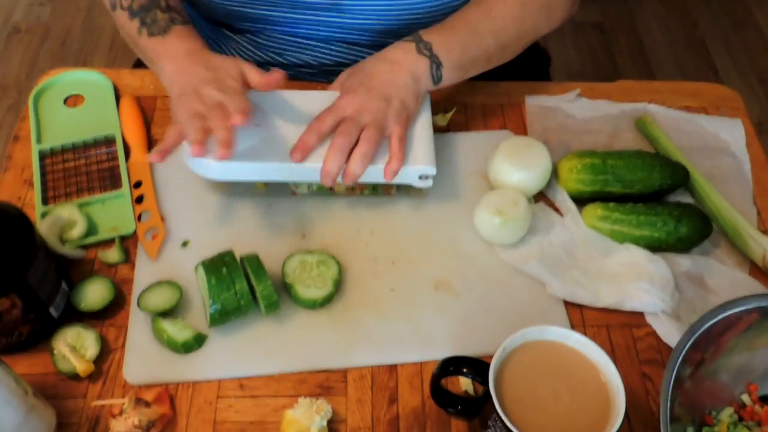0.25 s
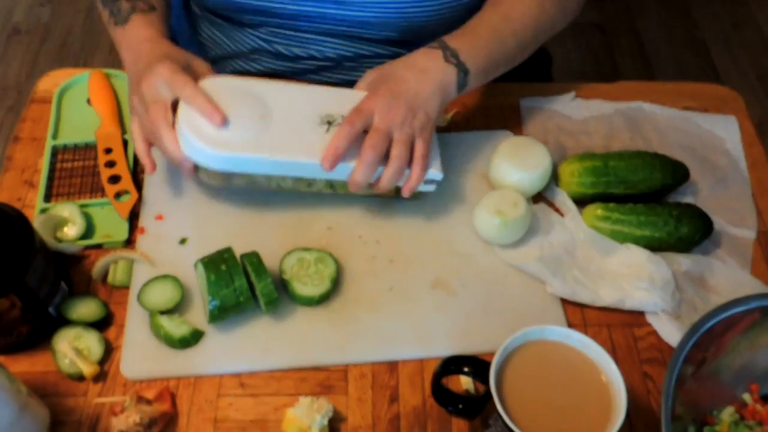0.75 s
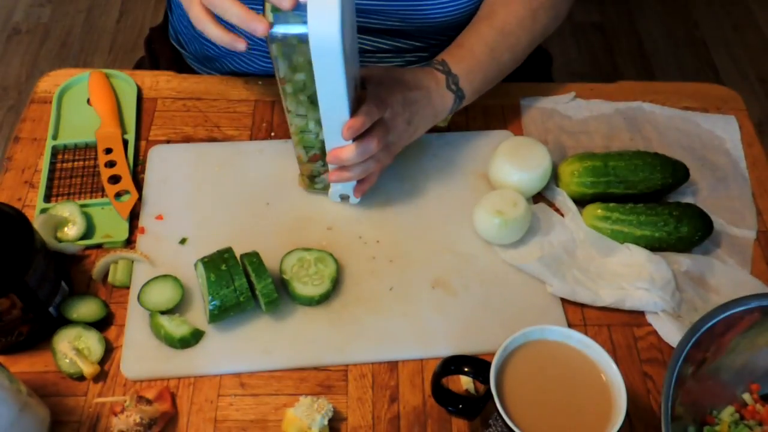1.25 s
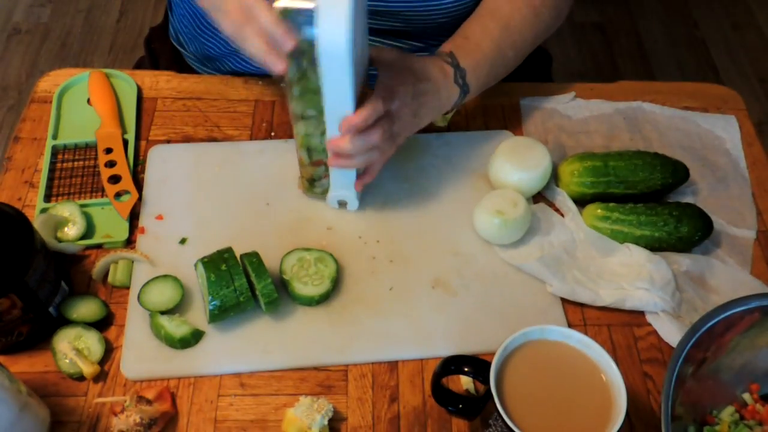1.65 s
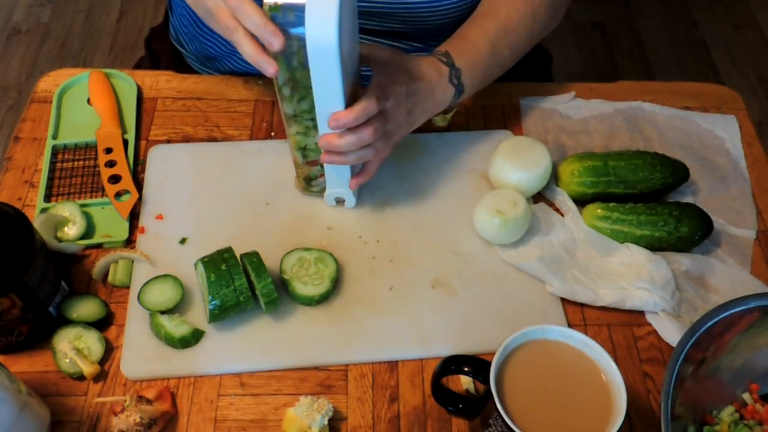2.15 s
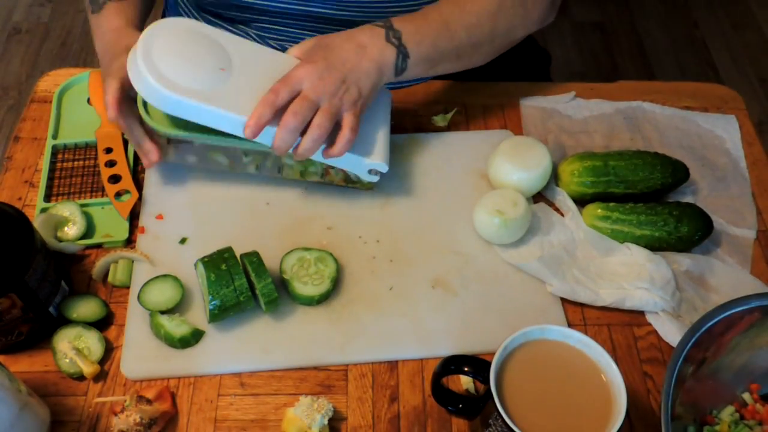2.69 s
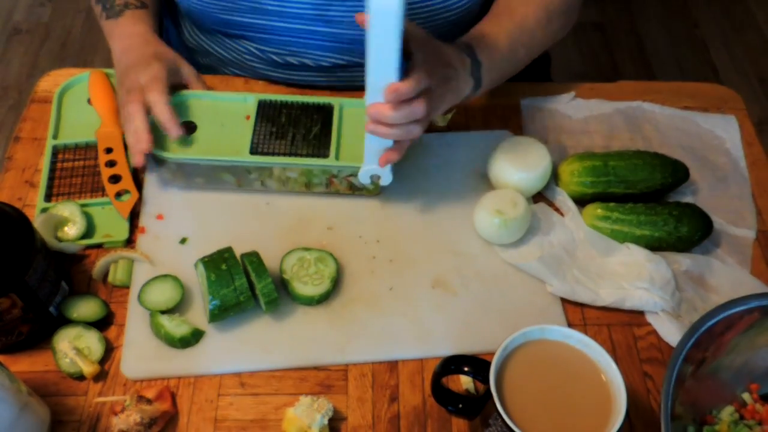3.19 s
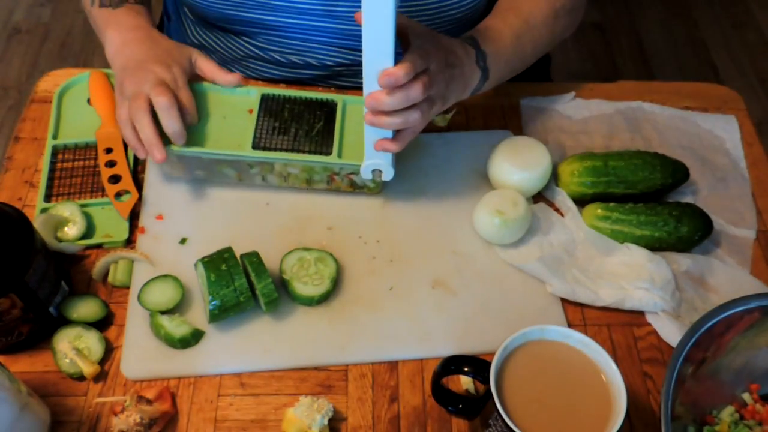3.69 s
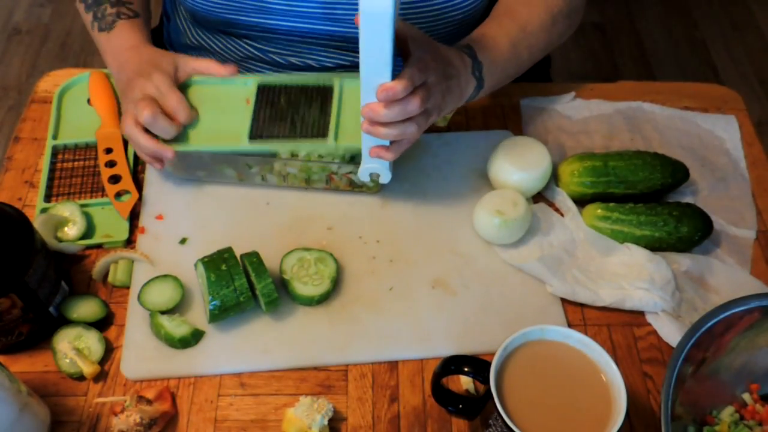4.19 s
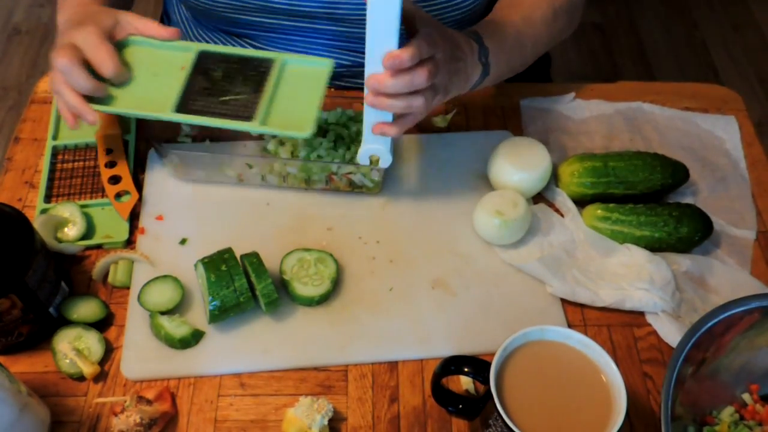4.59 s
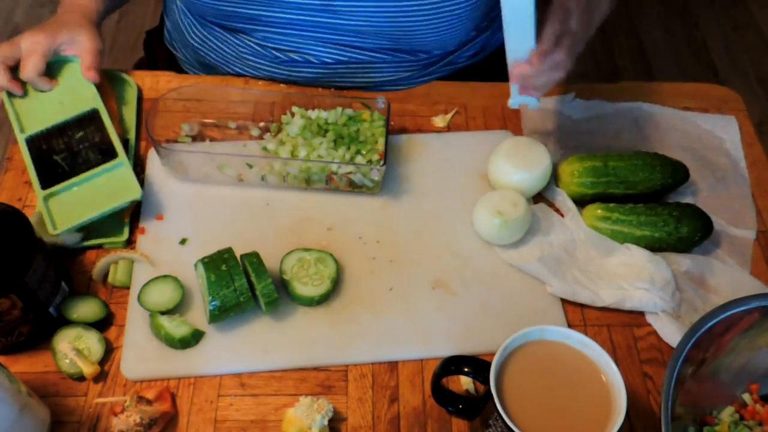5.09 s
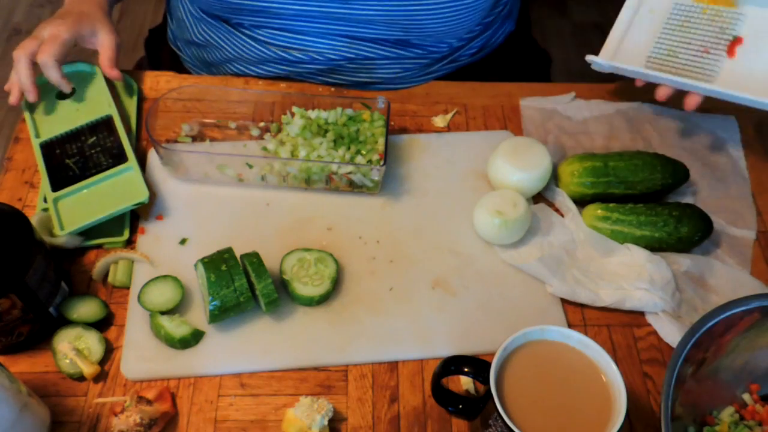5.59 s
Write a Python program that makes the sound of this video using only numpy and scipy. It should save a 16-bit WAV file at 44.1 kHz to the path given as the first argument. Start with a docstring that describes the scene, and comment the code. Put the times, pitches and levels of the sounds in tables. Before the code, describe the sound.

Two hard plastic slams with rattling rebounds, then hollow knocks on a box, a sharp plate snap, and a light clatter over fan hum.

```python
"""A plastic vegetable chopper on a cutting board: its lid is slammed down twice, the box is knocked and opened,
and its blade plate is prised out and laid aside. Impacts excite damped modes of board, table, box and plate
and shaped noise for walls and edges; rubbing is grainy noise. A fan adds air noise and unsteady tones, a low
rumble swells slowly, and handling bumps the microphones. Blows and rubs echo in a small kitchen. The close
microphones overload on strong peaks; their gain sinks and climbs steadily back."""
import sys
import numpy as np
from scipy import signal
from scipy.fft import rfft, irfft, next_fast_len
from scipy.io import wavfile
from scipy.ndimage import map_coordinates

SR = 44100
rng = np.random.default_rng(int(sys.argv[2]) if len(sys.argv) > 2 else 0)


def int16_out(signal):
    """Quantize to a 16-bit WAV file."""
    q = np.round(np.clip(np.atleast_2d(signal).T, -1, 1) * 32767)
    wavfile.write(sys.argv[1], SR, q.astype(np.int16))


N = 257984
AGE = np.arange(SR // 2) / SR  # time since a blow (s)

# spectrum of the fan's air noise, relative: (frequency [Hz], level [dB])
AIR_SPECTRUM = [(20, -12.5), (100, -6), (190, -12.5), (270, -2.5), (350, -6.5), (430, -11), (760, -10),
                (1300, -19.5), (2500, -25), (5000, -31), (8500, -32.5), (12500, -32.5), (14300, -42.5)]
# stereo width of the air noise: (frequency [Hz], side relative to mid [dB])
AIR_WIDTH = [(60, -6.5), (110, -13), (200, -17.5), (370, -19), (670, -10), (1230, -3.5), (2240, -2),
             (4100, 2), (7490, 0), (13700, -0.5)]
# fan tones: (frequency [Hz], mean level [dB])
FAN_TONES = [(242.2, -46.5), (360.7, -41), (748.3, -49), (1082, -60), (1497, -54), (1556, -59)]
# spectrum of the low rumble, relative: (frequency [Hz], level [dB])
RUMBLE_SPECTRUM = [(8, -2.5), (25, 1.5), (60, -3), (110, -7.5), (170, -14), (400, -59.5), (1000, -100)]
# stereo width of the rumble: (frequency [Hz], side relative to mid [dB])
RUMBLE_WIDTH = [(30, -1.0), (120, -5)]
# slow swells of the low rumble: (time [s], length [s], peak level before lumps [dB])
RUMBLE_SWELLS = [(0.45, 1, -32), (1.65, 0.72, -45), (2.705, 0.6, -39), (4.988, 0.65, -38.5)]
RUMBLE_REST_DB = -45.5  # between swells
# low bumps from handling the microphones: (time [s], frequency [Hz], level [dB], left relative to right [dB])
HANDLING_BUMPS = [(0.083, 88, -23, -27), (2.509, 113, -15.5, 14), (3.277, 83.6, -12.5, -10),
                  (4.076, 62, -14, -2), (5.315, 61, -16, 11)]
BUMP_T60_S = 0.052  # short and damped

# modes of the board on its table: (frequency [Hz], relative level [dB], decay t60 [s])
BOARD_MODES = [(223.8, -11.5, 0.16), (258, 1, 0.095), (280.6, -2.5, .08), (312.3, -2, 0.11)]
# modes of the hollow box: (frequency [Hz], relative level [dB], decay t60 [s])
BOX_MODES = [(293.2, -17, 0.19), (374.8, -3.5, 0.15), (478.4, -10, 0.12), (582, -12, 0.055),
             (667, -26, .08), (837, -17, 0.013), (949, -30, 0.15)]
# resonances of the thin plastic walls: (frequency [Hz], bandwidth [Hz], relative level [dB])
WALL_RESONANCES = [(473, 75, 8.5), (727, 172, 3.5), (910, 156, 2.5), (1143, 160, 1.5), (1525, 580, 1),
                   (2040, 610, -2.5), (2980, 450, -8), (5070, 2200, -13), (6260, 1100, -10)]
# spectrum of hard edges meeting: (frequency [Hz], relative level [dB])
EDGE_SPECTRUM = [(300, -27), (1200, -6.5), (2200, 1.5), (4000, 0.5), (6000, 0), (9500, 0.5), (12500, -5),
                 (14500, -1.5)]
# diffuse echo of the kitchen: (frequency [Hz], decay t60 [s], echo level before build-up [dB])
KITCHEN_ECHO = [(149.7, 0.51, 0.5), (267, 0.33, -20.5), (397, 0.23, -1), (1250, 0.34, -2),
                (3480, 0.33, -4.5), (10000, 0.27, -4.5)]
# stereo width of contact noise, rubbing and echo: (frequency [Hz], side relative to mid [dB])
CONTACT_WIDTH = [(150, -19.5), (370, -21.5), (900, -14), (2200, -6), (5500, 0.5), (13000, -0.5)]

# slams: (time [s], travel to the stop [s], strength [dB], weight on the board [dB], hardness of first touch [dB])
SLAMS = [(0.1472, 0.018, 11.5, -2, -15), (0.5238, 0.013, 14.5, -14.5, 3.5)]
# table modes under a slam: (frequency [Hz], relative level [dB], decay t60 [s])
TABLE_MODES = [(85.6, -3.5, 0.42), (149, 1.5, 0.34)]
TABLE_DB, TABLE_GROWS = -3, 0.29  # offset at a board thud of 0 dB, and dB per dB of thud
SLAM_HZ = 885  # centre of the clack
SLAM_BOX_DB, SLAM_CLACK_DB, SLAM_SNAP_DB = -0.5, -2, -4  # base offsets from the slam strength
STOP_BOARD_DB = -5  # the stop pushes the board less than the first touch
STOP_SNAP_SHARE = 0.5  # after a soft first touch the stop cracks harder (dB per dB)
REBOUND_S, REBOUND_LOSS_DB = 0.0125, 3.5  # time between rebounds, loss at each

# knocks on board or hand, body and snap relative to strength:
# (time [s], strength [dB], hollow body [dB], edge snap [dB])
KNOCKS = [(0.824, -25.5, -2, -27), (1.127, -11, -2, -25), (1.731, -28.5, 0.5, -21), (1.787, -17, -2, -31),
          (1.864, -3, -4, -7), (1.950, -20.5, -2, -25), (2.026, -37.5, 3, -30), (3.668, -22, -16, -19),
          (3.857, -18, -11, -28), (4.1363, -26, -7, -32)]
KNOCK_HZ, KNOCK_BOARD_DB = 880, -1  # centre of the clack; board relative to box
SETTLE_S, SETTLE_LOSS_DB, SETTLE_DULL_DB = 0.009, 8, 12  # time between rocks, loss, extra loss of the snap
# rubbing of plastic, hands and wet pieces, levels at mid-stroke:
# (time [s], length [s], low rub [dB], centre of the rub [Hz], high rustle [dB])
RUBS = [(1.58, 0.47, -41.5, 840, -49.5), (2.31, 0.075, -62, 1500, -46), (2.408, 0.098, -37.5, 820, -50),
        (4.28, 0.094, -26.5, 980, -39), (5.097, 0.15, -46, 1500, -52)]
# light ticks of the hinge and catches: (time [s], snap level [dB])
TICKS = [(2.114, -35.5), (2.372, -38.5), (3.402, -39), (3.433, -39), (3.518, -32.5)]
TICK_HZ, TICK_CLACK_DB = 2540, -2  # centre of the clack and its level relative to the snap
# the plate slips, springs free, grazes the box and is laid down:
# (time [s], snap level [dB], clack level [dB], centre of the clack [Hz])
PLATE_HITS = [(4.314, -26.5, -22, 1090), (4.3292, -2.5, 4, 2250), (4.679, -55, -32, 2240),
              (5.299, -14, -23.5, 2500), (5.312, -18, -24.5, 2300), (5.349, -25, -24.5, 2100)]
# modes of the blade plate: (frequency [Hz], relative level [dB], decay t60 [s])
PLATE_MODES = [(1840, -11, 0.1), (2090, -4, 0.085), (2230, 10, 0.022), (2660, 2, 0.051), (3030, -20, 0.071),
               (3250, -6, 0.058), (4420, 2, 0.1), (4840, -7, 0.17), (5640, -6, 0.1), (6860, -3.5, 0.18),
               (7600, -6, 0.12), (9500, -12, .08)]
TWANG_DB, PLATE_BOX_DB = -17.5, -20  # plate ring relative to the snap, box relative to the clack
CHATTER_S, CHATTER_LOSS_DB = 0.007, 8  # delay and loss of the second touch
TOP_HZ = 14200  # band limit


def amp(db):
    """Logarithmic level: decibels to amplitude gain."""
    return 10 ** (np.asarray(db) / 20)


def unit(x):
    """Normalisation: scale x to an rms of 1."""
    return x / np.sqrt(np.mean(x ** 2) + 1e-20)


def along(points, hz):
    """Interpolation of (frequency, value) points on a logarithmic frequency axis."""
    f, v = np.transpose(points)
    return np.interp(np.log(hz + 1), np.log(f + 1), v)


def add(track, s, sound):
    """Superposition: mix a sound into the track at time s."""
    part = track[:, round(s * SR):][:, :sound.shape[-1]]
    part += sound[..., :part.shape[-1]]


def wobble(rate, size):
    """Slow random modulation: a smooth curve through rate random knots a second."""
    knots = rng.standard_normal(int(size * rate / SR) + 4)
    return map_coordinates(knots, [np.arange(size) * rate / SR])


def noise(colour, width, size):
    """Filtered noise: colour sets the gain by frequency, independent side noise the width; mid has rms 1."""
    m = next_fast_len(size)
    hz = np.fft.rfftfreq(m, 1 / SR)
    mid, side = rfft(rng.standard_normal((2, m))) * colour(hz)
    mid = irfft(mid, m)
    side = irfft(side * amp(along(width, hz)), m)
    return np.array([mid + side, mid - side])[:, :size] / np.std(mid)


def fan(air_db=-39.0, waver_db=3.5, drift_rad=0.2):
    """Broadband flow noise plus motor tones whose amplitude and phase wander slowly."""
    t = np.arange(N) / SR
    track = amp(air_db) * noise(lambda hz: amp(along(AIR_SPECTRUM, hz)), AIR_WIDTH, N)
    for hz, db in FAN_TONES:
        level = amp(db + waver_db * wobble(1.55, N))
        track += level * np.sin(2 * np.pi * hz * t + drift_rad * wobble(3.1, N))
    return track


def rumble(lumpy_db=2.3):
    """Amplitude-modulated low noise, different at the two microphones, with slow swells and random lumps."""
    level = np.full((1, N), amp(RUMBLE_REST_DB))
    for s, length, db in RUMBLE_SWELLS:
        add(level, s, amp(db) * np.hanning(int(length * SR)))
    low_noise = noise(lambda hz: amp(along(RUMBLE_SPECTRUM, hz)), RUMBLE_WIDTH, N)
    return level * amp(lumpy_db * wobble(12, N)) * low_noise


def swing(hz, db, t60, rise_s=0.0071):
    """Damped oscillation with a gradual onset."""
    envelope = amp(db - 60 * AGE / t60) * (1 - np.exp(-AGE / rise_s))
    return envelope * np.sin(2 * np.pi * hz * AGE)


def bumps():
    """Handling noise: short damped low oscillations, at unequal levels left and right."""
    track = np.zeros((2, N))
    for s, hz, db, pan_db in HANDLING_BUMPS:
        add(track, s, swing(hz, db, BUMP_T60_S) * amp([[pan_db / 2], [-pan_db / 2]]))
    return track


def walls(centre_hz, slope_db=6):
    """Resonant filtering: harder contact, with a higher centre, favours higher wall modes (slope in dB/octave)."""
    def colour(hz):
        response = 0
        for k, (c, w, db) in enumerate(WALL_RESONANCES):
            resonance = 1j * hz * w / (c * c - hz * hz + 1j * hz * w)
            response = response + (-1) ** k * amp(db) * resonance
        octaves_away = abs(np.log2((hz + 1) / centre_hz))
        return abs(response) * amp(-slope_db * octaves_away)
    return colour


def edges(hz):
    """Short stiff contact: the bright spectrum of hard edges meeting."""
    return amp(along(EDGE_SPECTRUM, hz))


def ring(modes, vary_db, detune):
    """Modal superposition: grip and point of contact alter each damped mode's level and pitch a little."""
    sound = 0
    for k, (hz, db, t60) in enumerate(modes):
        level_chance, pitch_chance = rng.standard_normal(2)
        envelope = amp(db + vary_db * level_chance - 60 * AGE / t60)
        sound = sound + (-1) ** k * envelope * np.sin(2 * np.pi * hz * (1 + detune * pitch_chance) * AGE)
    return sound


def in_kitchen(sound, build_s=0.004):
    """Diffuse reverberation: the direct sound plus a fresh echo that builds up from nearby surfaces."""
    room = np.array(KITCHEN_ECHO)
    hz, t, z = signal.stft(noise(np.ones_like, CONTACT_WIDTH, len(AGE)), SR, nperseg=256)
    t60 = along(room[:, [0, 1]], hz)[:, None]
    level = along(room[:, [0, 2]], hz)[:, None]
    energy = SR * t60 / (2 * np.log(1000))  # of the decay alone, divided out
    decaying = z * amp(level - 60 * t / t60) / np.sqrt(energy)
    tail = signal.istft(decaying, SR, nperseg=256)[1][:, :len(AGE)]
    tail = tail * (1 - np.exp(-(AGE / build_s) ** 2))
    tail[:, 0] += 1  # the direct path
    return signal.fftconvolve(sound, tail, axes=1)


def contact(board_db, box_db, clack_db, centre_hz, snap_db, clack_t60=0.045, snap_t60=0.035):
    """Impact excitation: board and box modes ring, walls rattle and edges crack as decaying noise."""
    board = amp(board_db) * ring(BOARD_MODES, vary_db=3.6, detune=0.015)
    box = amp(box_db) * ring(BOX_MODES, vary_db=5.0, detune=0.0069)
    clack = amp(clack_db - 60 * AGE / clack_t60) * noise(walls(centre_hz), CONTACT_WIDTH, len(AGE))
    snap = amp(snap_db - 60 * AGE / snap_t60) * noise(edges, CONTACT_WIDTH, len(AGE))
    return in_kitchen(board + box + clack + snap)


def slams(count=3):
    """Repeated impact: the lid meets the vegetable, thumps board and table, then hits its stop and rebounds."""
    track = np.zeros((2, N))
    for s, travel_s, db, weight_db, hard_db in SLAMS:
        thud_db = db + weight_db
        touch_db = db + hard_db / 2
        touch_snap_db = db + SLAM_SNAP_DB + hard_db
        touch = contact(thud_db, touch_db + SLAM_BOX_DB, touch_db + SLAM_CLACK_DB, SLAM_HZ, touch_snap_db)
        add(track, s, touch)
        for hz, level, t60 in TABLE_MODES:
            add(track, s, swing(hz, TABLE_DB + TABLE_GROWS * thud_db + level, t60))
        for k in range(count):
            stop_db = db - k * REBOUND_LOSS_DB
            board_db = stop_db + weight_db + STOP_BOARD_DB
            snap_db = stop_db + SLAM_SNAP_DB - STOP_SNAP_SHARE * hard_db
            stop = contact(board_db, stop_db + SLAM_BOX_DB, stop_db + SLAM_CLACK_DB, SLAM_HZ, snap_db)
            add(track, s + travel_s + k * REBOUND_S, stop)
    return track


def knocks(count=3):
    """Energy loss in rocking: the box lands on one edge and comes to rest, each time softer and duller."""
    track = np.zeros((2, N))
    for s, strength_db, body_db, snap_db in KNOCKS:
        for k in range(count):
            db = strength_db - k * SETTLE_LOSS_DB
            dull_db = k * SETTLE_DULL_DB
            box_db = db + body_db
            knock = contact(box_db + KNOCK_BOARD_DB, box_db, db - dull_db / 2, KNOCK_HZ, db + snap_db - dull_db)
            add(track, s + k * SETTLE_S, knock)
    return track


def rubs(grain_db=3):
    """Stick-slip friction: sliding surfaces catch and slip in small uneven grains."""
    track = np.zeros((2, N))
    for s, length, low_db, centre_hz, high_db in RUBS:
        size = int(length * SR)
        grains = unit(amp(grain_db * wobble(238, size)))
        low_rub = amp(low_db) * noise(walls(centre_hz), CONTACT_WIDTH, size)
        rustle = amp(high_db) * noise(edges, CONTACT_WIDTH, size)
        add(track, s, in_kitchen(np.hanning(size) * grains * (low_rub + rustle)))
    return track


def ticks():
    """Light impact: small catches click without ringing board or box."""
    track = np.zeros((2, N))
    for s, db in TICKS:
        add(track, s, contact(-np.inf, -np.inf, db + TICK_CLACK_DB, TICK_HZ, db))
    return track


def blade_plate():
    """Plate vibration: the stiff plate with its steel grid rings briefly, clacks and springs to a second touch."""
    track = np.zeros((2, N))
    for s, snap_db, clack_db, centre_hz in PLATE_HITS:
        twang = amp(snap_db + TWANG_DB) * ring(PLATE_MODES, vary_db=1.5, detune=0.001)
        add(track, s, in_kitchen(twang[None]))
        for k in range(2):
            touch_db = clack_db - k * CHATTER_LOSS_DB
            touch_snap_db = snap_db - k * CHATTER_LOSS_DB
            touch = contact(-np.inf, touch_db + PLATE_BOX_DB, touch_db, centre_hz, touch_snap_db)
            add(track, s + k * CHATTER_S, touch)
    return track


def scene():
    """Superposition of all sources, with a level difference that places everything a little to the right."""
    right_db = 1.0  # right raised and left lowered by this much
    chopper = slams() + knocks() + rubs() + ticks() + blade_plate()
    return (fan() + rumble() + bumps() + chopper) * amp([[-right_db], [right_db]])


def gain_control(x, limit_db=-7, attack_s=0.043, recover_db=19.0, start_db=-3):
    """Feedback compression: peaks well over the limit sink the gain; it recovers at recover_db a second to 0 dB."""
    hop = SR // 1000  # about 1 ms
    blocks = abs(x[:, :N // hop * hop]).max(0).reshape(-1, hop)
    peaks = 20 * np.log10(blocks.max(1) + 1e-9)
    gain, gains = start_db, []
    for peak in peaks:
        gains.append(gain)
        excess = max(peak + gain - limit_db, 0)
        gain = min(gain + (recover_db - excess / attack_s) * hop / SR, 0)
    return x * amp(np.interp(np.arange(N) / hop, np.arange(len(gains)), gains))


def record(dry):
    """Nonlinear reception: gain control too slow for the slams, soft saturation and a steep band limit."""
    x = gain_control(dry)
    ceiling = .93
    x = x / (1 + abs(x / ceiling) ** 6) ** (1 / 6)
    m = next_fast_len(N + SR // 2)
    lowpass = 1 / np.sqrt(1 + (np.fft.rfftfreq(m, 1 / SR) / TOP_HZ) ** 180)
    return np.clip(irfft(rfft(x, m) * lowpass, m)[:, :N], -1, 1)


dry = scene()
out = record(dry)
int16_out(out)
```